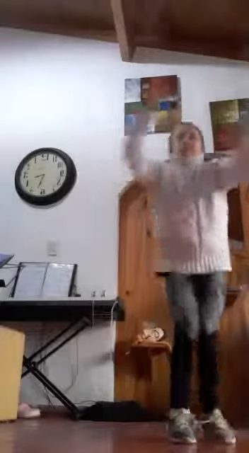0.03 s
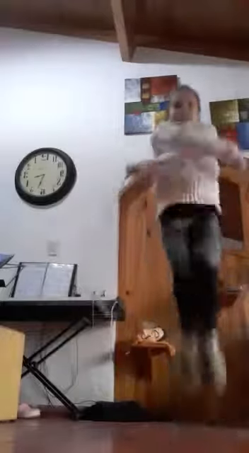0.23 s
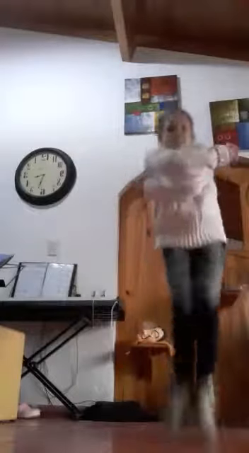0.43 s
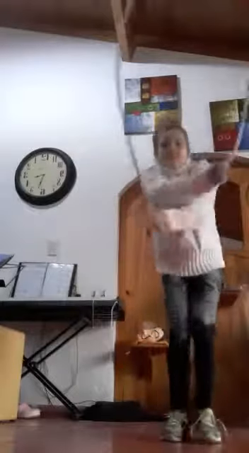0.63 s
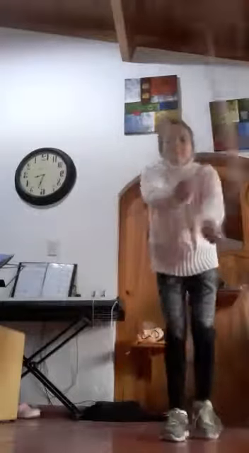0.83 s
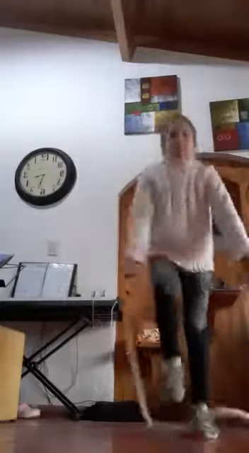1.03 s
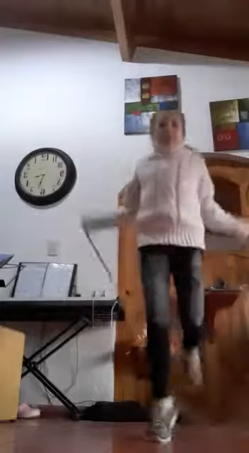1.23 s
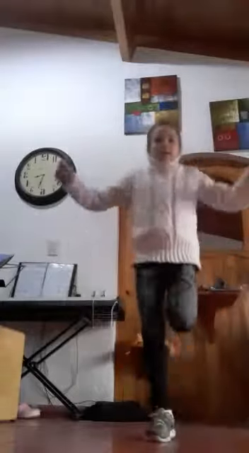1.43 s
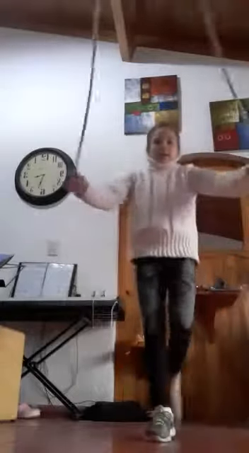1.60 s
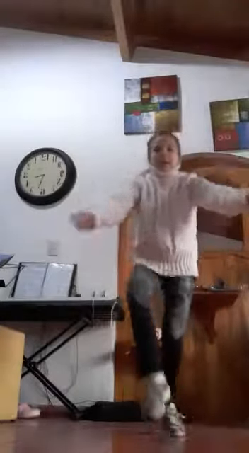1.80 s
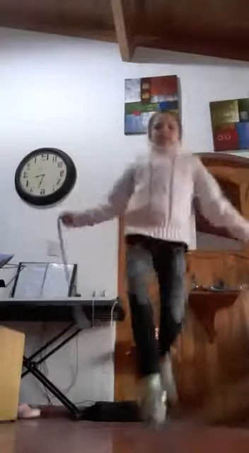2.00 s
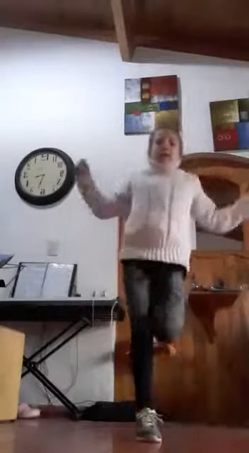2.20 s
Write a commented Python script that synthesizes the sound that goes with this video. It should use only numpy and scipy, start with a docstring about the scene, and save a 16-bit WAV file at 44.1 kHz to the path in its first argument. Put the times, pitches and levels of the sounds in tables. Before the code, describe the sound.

Someone skips rope in a reverberant room: the rope swishes faintly and slaps the floor again and again as feet thud softly. A few woody knocks join in over low room noise, with the sound leaning a little right.

```python
"""Skipping rope in a live room

A child skips on a hard floor between bare walls. The rope whips through the air and cracks
on the floor, trainers thud dully, and a few hollow knocks sound among them. Each blow fills
the room with a bright wash and booming low resonances, over a low, steady background."""
import sys
import numpy as np
from scipy import signal
from scipy.fft import rfft, irfft, next_fast_len
from scipy.io import wavfile

SR = 44100
rng = np.random.default_rng(int(sys.argv[2]) if len(sys.argv) > 2 else 0)


def unload_wav(signal):
    """Save mono or channel-first audio to the path in sys.argv[1] as 16-bit WAV at rate SR, clipped to [-1, 1]."""
    wavfile.write(
        sys.argv[1],
        SR,
        np.round(np.clip(np.atleast_2d(signal).T, -1, 1) * 32767).astype(np.int16),
    )


N = 103635
PRE_ROLL, FFT_SIZE = SR // 2, 32768  # samples
HZ = np.fft.rfftfreq(FFT_SIZE, 1 / SR)


def from_db(db):
    """Decibels to amplitude."""
    return np.exp(np.asarray(db) * np.log(10) / 20)


def curve(points, hz=HZ):
    """Join (frequency, value) points on a log-frequency axis."""
    frequencies, values = np.array(points).T
    return np.interp(np.log(hz + 1), np.log(frequencies), values)


def bell(hz, octaves):
    """Shape of a broad resonance, 1 at its centre."""
    return np.exp(-.5 * (np.log2((HZ + 1) / hz) / octaves) ** 2)


def high_shelf(hz):
    """Shelf shape rising from 0 in the bass to 1 in the treble."""
    return 1 - 1 / (1 + (HZ / hz) ** 2)


def high_cut(hz, order=6):
    """Treble roll-off of a soft contact, in dB."""
    return -10 * np.log10(1 + np.minimum(HZ / hz, 10) ** order)


def low_cut(hz, order=6):
    """Roll-off of the deepest bass in a light step, in dB."""
    return -10 * np.log10(1 + np.minimum(hz / (HZ + 1), 2) ** order)


def pulse(spectrum_db):
    """The shortest causal pulse with this spectrum."""
    cepstrum = irfft(np.log(from_db(spectrum_db)))
    cepstrum[1:FFT_SIZE // 2] *= 2
    cepstrum[FFT_SIZE // 2 + 1:] = 0
    return irfft(np.exp(rfft(cepstrum)))[:SR // 10]


def diffuse_noise(size, mono_below_hz=720):
    """Spectrum and frequencies of white stereo noise: centred in the bass, wide above."""
    hz = np.fft.rfftfreq(size, 1 / SR)
    coherence = .99 / (1 + (hz / mono_below_hz) ** 6)
    mid, side = rfft(rng.standard_normal((2, size)))
    stereo = np.sqrt(1 + coherence) * mid + np.sqrt(1 - coherence) * side * [[1], [-1]]
    return stereo / np.sqrt(2), hz


# Diffuse reverb tail: (band centre [Hz], level [dB], T60 [s])
REVERB_BANDS = [(49.7, 7, 0.44), (117, 0, 0.52), (185, 6, 0.38), (338, 9.5, 0.56), (900, 6, 0.52),
                (1720, 5.5, 0.57), (4200, 9.5, 0.58), (7700, 6, 0.45), (14000, 2.5, 0.34)]
# Early wall reflections, scattered by the furniture: (delay [s], level [dB])
EARLY_REFLECTIONS = [(.0065, -8), (0.0087, -11.5), (0.015, -5)]
# Standing waves and the ring of wooden furniture: (pitch [Hz], level [dB], T60 [s])
ROOM_MODES = [(70, -53, .75), (109, -51.5, .7), (162, -56, .9), (231, -50, .62), (272, -56, .5),
              (314, -47.5, .65), (356, -53, .7), (448, -56, .6), (495, -54, .6), (573, -53, .55),
              (726, -56, .6), (787, -57, .6), (893, -58, .6), (1150, -57, .6), (1254, -57, .6),
              (1700, -56, .65), (1896, -56, .65)]


def room_reverb(swell_s=.03, swell_depth=.61, scatter_s=.00047, mode_attack_s=.00092):
    """The room's response from one spot: a swelling, dying wash, wall echoes and standing waves."""
    t = np.arange(FFT_SIZE) / SR
    noise, hz = diffuse_noise(FFT_SIZE)
    centres = np.array(REVERB_BANDS)[:, 0]
    swell = 1 - swell_depth * np.exp(-t / swell_s)
    wash = echoes = ringing = 0
    for solo, (_, db, t60) in zip(np.eye(len(centres)), REVERB_BANDS):
        envelope = swell * from_db(-60 * t / t60)
        band = irfft(noise * curve(np.c_[centres, solo], hz))
        wash += from_db(db) * band * envelope / np.linalg.norm(envelope)
    scattered = irfft(diffuse_noise(FFT_SIZE)[0])
    for delay, db in EARLY_REFLECTIONS:
        burst = np.exp(-.5 * ((t - delay) / scatter_s) ** 2)
        echoes += from_db(db) * scattered * burst / np.linalg.norm(burst)
    for mode_hz, db, t60 in ROOM_MODES:
        envelope = from_db(db - 60 * t / t60)
        ringing += envelope * np.sin(2 * np.pi * (mode_hz * t + rng.random()))
    return wash + echoes + (1 - np.exp(-t / mode_attack_s)) * ringing


def impact(spectrum_db, direct_db, contact_s, smear_step_hz=1620):
    """A hit smeared unevenly over its contact time, heard directly and through the room."""
    knots_hz = np.arange(0, SR, smear_step_hz)
    group_delay = contact_s * np.interp(HZ, knots_hz, rng.random(100)[:len(knots_hz)])
    phase = -2 * np.pi * np.cumsum(group_delay) * SR / FFT_SIZE
    direct = irfft(from_db(direct_db) * np.exp(1j * phase))
    direct[SR // 20:] = 0
    notch_db = -8 * bell(hz=172.7, octaves=.14)  # a wall reflection cancels the upper bass
    tone = pulse(spectrum_db + notch_db)
    return signal.fftconvolve(direct + room_reverb(), tone[None], axes=1)


# Base tone of a slap: (frequency [Hz], level [dB])
SLAP_EQ = [(30, -53), (65, 4), (120, 3.5), (270, 4.5), (500, 0), (850, -1), (1400, 4.5), (2100, 2),
           (3000, -4.5), (5000, -10.5), (8500, -10.5), (10000, -17.5), (13000, -15), (16000, -32.5)]
# Rope slaps (one followed by a quick bright echo), grazes and a dry handle click:
# (time [s], gain [dB], low shelf [dB], high shelf [dB], direct gain [dB],
# contact time [s], snap pitch [Hz], boom pitch [Hz], boom gain [dB], clack pitch [Hz])
ROPE_HITS = [(-.15, 3, 5.5, 2.5, 0, .001, 4000, 390, 3.5, 2120),
             (.3148, -13.5, -14, 12, 1, 0.00057, 2800, 600, 7, 2520),
             (0.3224, -8.5, 6, 8.5, 0.5, .0016, 3760, 555, -6, 1230),
             (0.4489, 4.5, 8.5, 2.5, -4, 0.00187, 5170, 235, 0.5, 1570),
             (0.831, -25.5, 10.5, 8, -10, 0.00066, 8000, 335, 6, 1700),
             (0.8982, -12, -1.5, -6, 10, 0.00091, 3350, 790, -3, 1606),
             (1.2188, 2, .5, 0, -4.5, 0.0012, 5860, 252, -2, 1900),
             (1.6267, 0.5, -1, 4.5, -2, 0.00149, 8300, 321, 8.5, 1400),
             (1.642, -12, -10, 14, 0, .0015, 8800, 320, -8, 1400),
             (1.885, -19, -5, -8, 9, 0.0018, 8060, 342, 6, 2850),
             (2.0349, -2, 5, 1, 0.5, 0.00086, 4970, 255, 3, 1120),
             (2.3356, -1, 0, -4.5, -4, 0.001, 8100, 600, 5, 1400)]


def rope_hits(snap_db=10.5, clack_db=2.5, direct_treble_db=-1):
    """Rope slaps and a handle click: millisecond contacts, each with its own snap, boom and clack."""
    bass, treble = 1 - high_shelf(hz=450), high_shelf(hz=4000)
    for time, db, bass_db, treble_db, direct_db, contact_s, *resonances in ROPE_HITS:
        snap_hz, boom_hz, boom_db, clack_hz = resonances
        body = boom_db * bell(boom_hz, octaves=.18) + clack_db * bell(clack_hz, octaves=.15)
        tone = curve(SLAP_EQ) + db + bass_db * bass + treble_db * treble + body
        crack = direct_db + snap_db * bell(snap_hz, octaves=.38) + direct_treble_db * treble
        yield time, impact(tone, crack, contact_s)


# Tone of the background bed: (frequency [Hz], level [dB])
ROOM_TONE_EQ = [(20, -1), (45, 8), (66, 23), (110, 27), (170, 6), (340, 15.5), (700, 0.5), (1800, -9),
                (4000, -4.5), (8500, -4.5), (11000, -8.5), (16000, -16)]


def room_tone(gain_db=-63):
    """A low, steady bed of diffuse noise."""
    noise, hz = diffuse_noise(2 * next_fast_len(N))
    return irfft(noise * from_db(gain_db + curve(ROOM_TONE_EQ, hz)))[:, :N]


# Tone of the rushing air: (frequency [Hz], level [dB])
SWISH_EQ = [(60, -35), (200, 10.5), (340, 14.5), (550, 7.5), (900, -3.5), (1800, 11), (3200, 3),
            (5500, 3.5), (8500, 7.5), (10500, 0), (13000, 6), (16000, -7)]
# Rope pass-bys: (peak time [s], gain [dB], half width [s], high shelf [dB])
ROPE_SWISHES = [(0.13, -43, 0.036, -15), (1.104, -54.5, 0.032, -4), (1.912, -43.5, 0.017, -10)]


def rope_swishes(reverb_db=-8, direct_db=-3):
    """Air rushes round the rope, swelling and fading as its loop sweeps past."""
    t = np.arange(FFT_SIZE) / SR - .25  # zero at the peak
    for time, db, half_width, treble_db in ROPE_SWISHES:
        tone = from_db(curve(SWISH_EQ) + db + treble_db * high_shelf(hz=3500))
        envelope = np.exp(-.5 * (t / half_width) ** 2)
        air = irfft(rfft(rng.standard_normal(FFT_SIZE)) * tone) * envelope
        reverb = signal.fftconvolve(room_reverb(), air[None], axes=1)[:, :FFT_SIZE]
        yield time + t[0], from_db(direct_db) * air + from_db(reverb_db) * reverb


# Tone of a thud before its cuts: (frequency [Hz], level [dB])
THUD_EQ = [(25, -25), (45, -2.5), (70, -3.5), (130, 6), (300, -2.5), (700, -1), (2000, 15.5), (16000, -67)]
# Soft foot thuds of take-offs and landings:
# (time [s], gain [dB], low cut [Hz], high cut [Hz], direct gain [dB])
FOOT_THUDS = [(.172, -2, 102, 128, 10), (0.189, 10.5, 106, 161, -19), (0.4507, 8.5, 67.4, 388, 8.5),
              (0.494, 11, 61, 597, 3.5), (0.901, -4, 70, 131, 4.5), (1.147, -6, 260, 380, 5),
              (1.227, 1, 65, 169, 6), (1.275, 3.5, 55, 199, -1), (1.650, 5, 45, 425, -3),
              (1.685, -3, 59.7, 420, -2), (1.725, -2.5, 240, 420, 0), (1.801, -0.5, 55, 120, -8),
              (1.929, -5, 253, 382, 11), (2.121, -1, 60, 296, 2)]


def foot_thuds():
    """A foot loads the floor with a soft, bassy thud as it pushes off or lands."""
    for time, db, low_hz, high_hz, direct_db in FOOT_THUDS:
        tone = curve(THUD_EQ) + db + low_cut(low_hz) + high_cut(high_hz)
        yield time, impact(tone, direct_db, contact_s=.00562)


# Tone of a knock before its high cut: (frequency [Hz], level [dB])
KNOCK_EQ = [(30, -54), (70, -40), (150, 7.5), (320, 5.5), (600, 3.5), (1100, 3), (2000, -4.5), (3500, -1),
            (8000, -6), (16000, -19)]
# Woody knocks: (time [s], gain [dB], high cut [Hz], direct gain [dB], boom pitch [Hz], boom gain [dB])
HOLLOW_KNOCKS = [(.188, -11.5, 1360, 2, 790, 3), (.2960, 1, 2970, 3, 570, 6.5),
                 (.2978, 1.5, 626, 6.5, 198, 5.5), (.3044, -2.5, 780, 6, 610, 5.5),
                 (0.8995, -15, 1260, 13.5, 1060, 2), (1.8869, -13.5, 1090, 8, 680, 0.5),
                 (2.113, -6, 1420, 2, 302, -6.5), (2.128, -7, 470, 7.5, 292, 6)]


def hollow_knocks(crunch_db=-22.5):
    """Hollow, woody knocks with a faint crunch on top."""
    for time, db, high_hz, direct_db, boom_hz, boom_db in HOLLOW_KNOCKS:
        roll_off = np.maximum(high_cut(high_hz, order=14), crunch_db)
        tone = curve(KNOCK_EQ) + db + roll_off + boom_db * bell(boom_hz, octaves=.18)
        yield time, impact(tone, direct_db, contact_s=.00234)


def scene():
    """Rope, knocks and feet mixed over the room tone."""
    mix = np.zeros((2, PRE_ROLL + N + SR))
    for time, sound in [*rope_hits(), *hollow_knocks(), *foot_thuds(), *rope_swishes()]:
        start = PRE_ROLL + int(time * SR)
        mix[:, start:start + sound.shape[1]] += sound[:, :mix.shape[1] - start]
    return mix[:, PRE_ROLL:PRE_ROLL + N] + room_tone()


# Stereo balance: (frequency [Hz], right over left [dB])
STEREO_TILT = [(60, 4.5), (450, 3.5), (800, 2), (2000, 4.5), (3300, 4), (5500, 9.5), (9000, 11), (11500, 3),
               (16000, -7.5)]


def record(dry, left_lag_s=.00023, cutoff_hz=16300):
    """The right microphone is nearer and brighter; a steep low-pass trims the top of both."""
    microphones = np.array([pulse(side * curve(STEREO_TILT) / 2) for side in (-1, 1)])
    left, right = signal.fftconvolve(dry, microphones, axes=1)[:, :N]
    left = np.r_[np.zeros(int(left_lag_s * SR)), left][:N]
    low_pass = signal.ellip(10, .2, 80, cutoff_hz, fs=SR, output="sos")
    return signal.sosfilt(low_pass, [left, right])


dry = scene()
out = record(dry)
unload_wav(out)
```